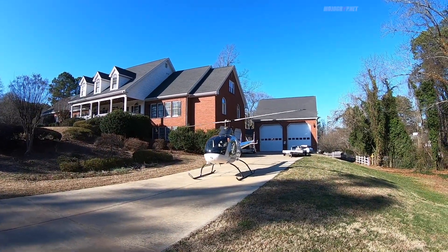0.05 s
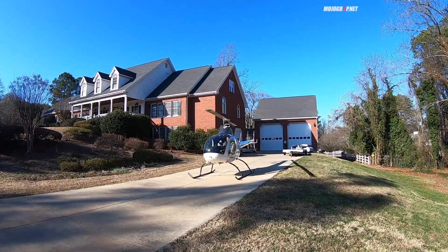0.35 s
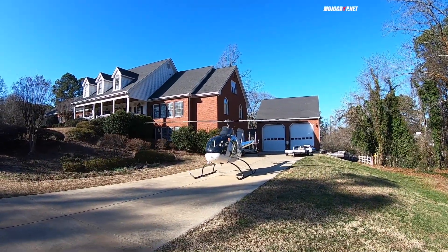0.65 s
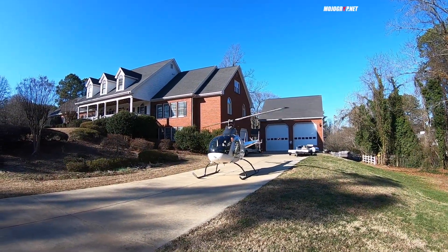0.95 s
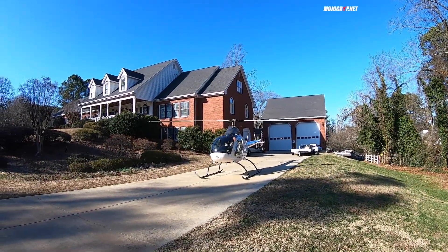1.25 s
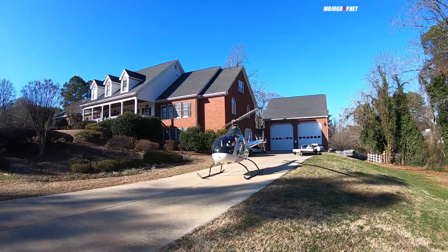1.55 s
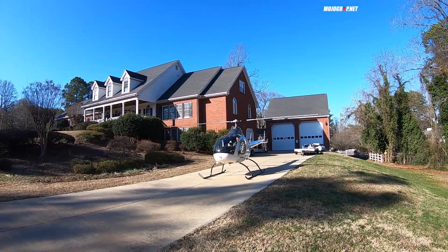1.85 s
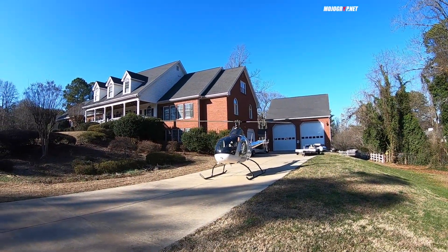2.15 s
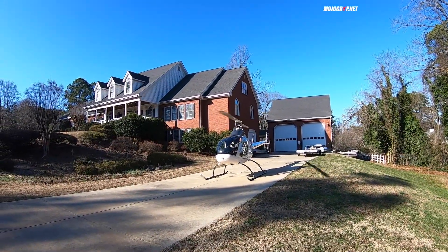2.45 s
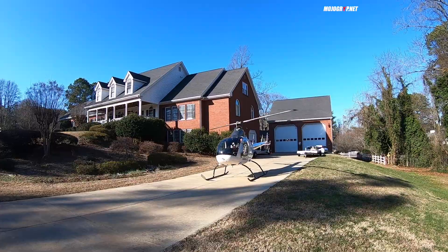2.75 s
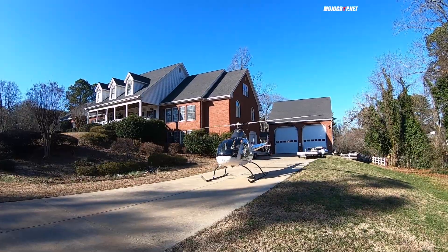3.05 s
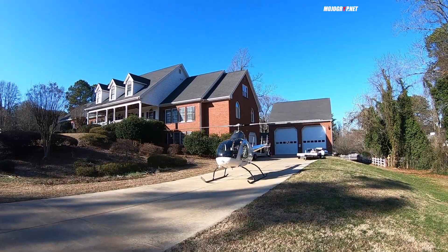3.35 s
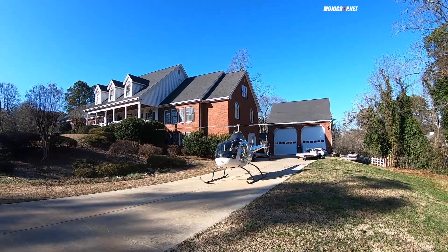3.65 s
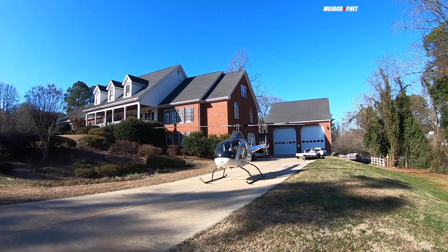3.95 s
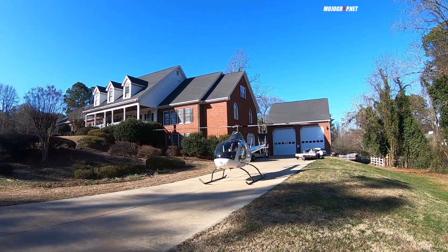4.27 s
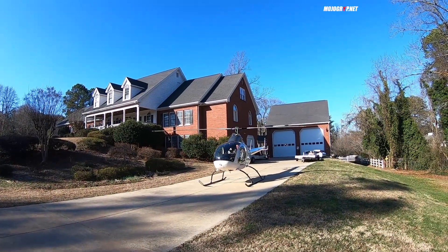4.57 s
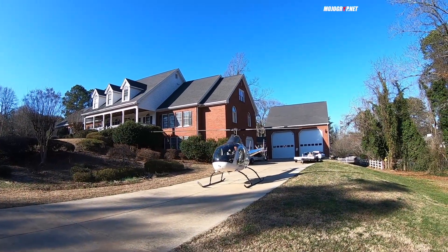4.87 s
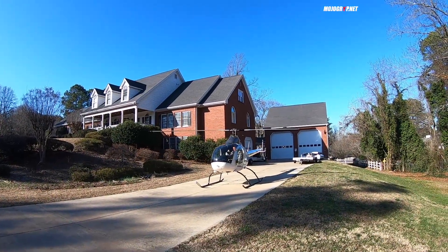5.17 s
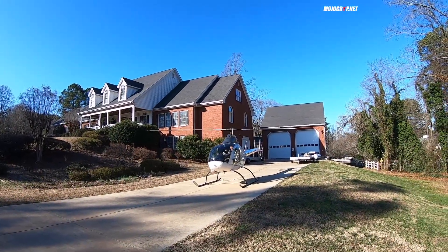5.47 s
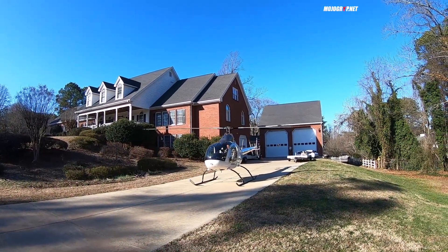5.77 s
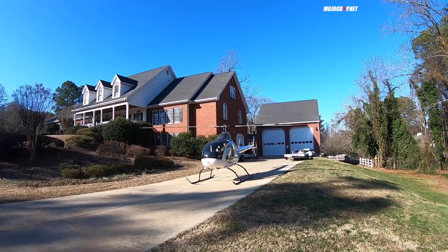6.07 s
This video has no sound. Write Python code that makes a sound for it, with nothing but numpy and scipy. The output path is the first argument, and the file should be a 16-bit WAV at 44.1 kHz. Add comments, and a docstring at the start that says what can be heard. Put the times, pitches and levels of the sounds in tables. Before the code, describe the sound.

Some distance away on a driveway, a small helicopter idles with an uneven, throbbing beat. The throttle soon opens, and the piston engine swells and rises in pitch, rattling as it gathers speed. The sound then settles into an even, booming drone with the tail rotor's hum mixed in and the main blades softly swishing. Towards the end, light gusts brush the microphone.

```python
"""A small helicopter runs up

Some way off, on a driveway by a brick house, four cylinders fire through a booming muffler.
A lumpy idle speeds up and settles into a drone. The engine clatters with every firing, the tail
rotor beats against the exhaust and the main blades swish. Light gusts rumble near the end."""
import sys
import numpy as np
from scipy import signal
from scipy.fft import rfft, irfft, next_fast_len
from scipy.io import wavfile
from scipy.ndimage import uniform_filter1d, minimum_filter1d

SR = 44100
rng = np.random.default_rng(int(sys.argv[2]) if len(sys.argv) > 2 else 0)


def wav_out(sig):
    """Save sig, one row per channel (or a flat mono array), as 16-bit PCM at SR to the path in sys.argv[1]."""
    wavfile.write(sys.argv[1], SR, np.round(np.clip(np.atleast_2d(sig).T, -1, 1) * 32767).astype(np.int16))


N = 278712
TIME = np.arange(N) / SR
FFT_SIZE = next_fast_len(N + SR // 4, True)
HZ = np.fft.rfftfreq(FFT_SIZE, 1 / SR)
IDLE_HZ, FULL_HZ = 30.374, 50.273  # firings per second
CYLINDERS, FIRINGS_PER_BLADE = 4, 7.4146

# Levels in the tables are relative. A "colour" says how strong the low and high pitches are.
# how strongly the exhaust pipe sounds each pitch: f/Hz, level/dB
PIPE_COLOUR = [(30, -18), (40, -25), (50, -29), (70, -29.5), (90, -37), (98, -23), (112, -22), (134, -15.5),
               (160, -17.5), (200, -20), (220, -32.5), (250, -47.5)]
# narrow bands where an exhaust tone fades: f/Hz, width/Hz, gain at the centre (negative flips the wave)
PIPE_DIPS = [(44.3, 1, .5), (48.54, 1, .36), (94.5, 2.4, .3), (147.15, 2.15, -.3), (184.5, 41, .25)]
# boom of the muffler: f/Hz, level/dB
MUFFLER_COLOUR = [(15, -44), (35, -20), (65, -5.5), (85, -6.5), (145, -3), (185, 1), (225, -6.5),
                  (270, -23), (400, -33.5), (900, -66), (4000, -110)]
# surges of uneven firing: peak t/s, half length/s, level/dB
ENGINE_SURGES = [(.24, .1, -17.5), (1.05, 0.55, -21.5)]
# tones of unequal cylinders: multiple of the firing rate, idle level/dB, full-speed level/dB
CYLINDER_TONES = [(1.5, -49, -40.5), (1.75, -37, -57.5), (2.25, -47.5, -33), (2.5, -42.5, -43.5),
                  (2.75, -36, -38.5), (3.25, -35, -33), (3.5, -34.5, -36), (3.75, -32.5, -43),
                  (4.25, -36, -43.5), (4.5, -41.5, -41.5), (5.5, -32.5, -52.5), (6, -35, -47),
                  (7, -51.5, -56), (7.25, -58, -48), (7.5, -47, -50), (8.5, -43, -55.5), (11, -48.5, -51),
                  (11.25, -46, -47), (12, -49, -47.5)]
# tones of the tail rotor and its drive: multiple of the firing rate, idle level/dB, full-speed level/dB
TAIL_ROTOR_TONES = [(1.78, -39.5, -41), (2.79, -55, -42), (2.833, -53.5, -37.5), (3.167, -46.5, -25.5),
                    (3.79, -41, -48.5), (4.167, -35.5, -48.5)]
# loudness shared by rattle, clatter, whine, hiss and blade noise: t/s, level/dB
MACHINE_LEVEL = [(0.08, -34), (0.13, -34.5), (1.48, -38.5), (2.03, -41), (3.69, -39), (4.6, -39),
                 (5.23, -36.5), (6.28, -38.5)]
# low rattle of the engine: f/Hz, level/dB
RATTLE_COLOUR = [(120, -36.5), (250, -2), (350, 0.5), (420, -6.5), (520, 0.5), (620, -1.5), (760, -9.5),
                 (1000, -17), (2000, -45.5), (8000, -82.5)]
# bright clatter of the engine: f/Hz, level/dB
CLATTER_COLOUR = [(400, -13), (750, -12), (1000, 2), (1250, 2.5), (1450, -3), (1750, -3.5), (1950, -3.5),
                  (2450, -3), (3300, -2.5), (4200, -6), (5200, -24.5), (7000, -22.5), (11000, -32),
                  (15000, -58.5)]
# ringing of the pipe, cylinder fins and covers: f/Hz, width/Hz, boost/dB
METAL_RINGS = [(311, 18, 3.5), (547, 50, 3.5), (926, 59, 2.5), (1140, 69, 2), (1352, 63, 4),
               (1630, 144, 5.5), (1740, 89, 7), (2122, 120, 6.5), (3520, 600, 2.5)]
# whine of the thin engine covers: f/Hz, width/Hz, level/dB
COVER_TONES = [(955.5, 28.5, -3), (1617, 65, 0.5), (2066, 24, -3), (2844, 95, -1.5), (3163, 38, -4),
               (3350, 200, -1), (4750, 310, -8)]
# hiss of escaping exhaust gas: f/Hz, level/dB
HISS_COLOUR = [(2500, -20.5), (4200, 1), (4900, 5.5), (5900, -2), (7000, -4), (7800, -4), (8400, -9),
               (9700, -9.5), (11000, -20), (12500, -18.5), (15000, -28)]
# hollow rushes as the engine picks up: peak t/s, half length/s, level/dB
RUSH_SWELLS = [(.9, 0.17, -41), (1.3, 0.15, -30)]
# colour of those rushes: f/Hz, level/dB
RUSH_COLOUR = [(150, -16), (300, 4.5), (480, 6.5), (700, -8), (970, 3), (1250, -4), (2000, -14),
               (4000, -60), (9000, -78)]
# air stirred by the main blades: f/Hz, level/dB
SWISH_COLOUR = [(1500, -13), (4000, -2), (5400, 6), (6500, 4), (7500, 0.5), (8400, -8.5), (9600, -4.5),
                (11200, -20.5), (12500, -19.5), (15000, -38)]
# light gusts of wind: peak t/s, half length/s, level/dB
WIND_GUSTS = [(4.1, 0.45, -43), (4.95, 0.43, -38)]
# rumble of wind on the microphone: f/Hz, level/dB
WIND_COLOUR = [(10, 3), (25, 5), (65, -1.5), (130, 3), (250, -22), (600, -41), (4000, -86)]
# how unlike left and right are: f/Hz, level/dB of their difference against what they share
STEREO_WIDTH = [(250, -45), (500, -17.5), (720, -7), (1000, -9.5), (1450, -11.5), (2000, -16.5),
                (3200, -26.5), (4500, -26), (5200, -6), (6500, -5), (8300, 3.5), (11500, -5), (14500, 2)]
# which way each pitch leans: f/Hz, level/dB of left against right
STEREO_TILT = [(300, 0), (550, -.6), (800, -1.4), (1300, -1.2), (2200, -.3), (4500, 0), (8500, -1.8),
               (12500, 1.7)]


def firing_rate(run_up_s=2.3645, shape=1.3022):
    """The engine runs up: firings per second climb from idle and level off at full speed."""
    return FULL_HZ - (FULL_HZ - IDLE_HZ) * np.exp(-(TIME / run_up_s) ** shape)


def exhaust(firings, rate, load, opened, boom_hz=178, width_hz=45):
    """Five tones at multiples of the firing rate climb through the pipe, which rings after each firing."""
    note, pipe_db = np.zeros(N), spectrum(PIPE_COLOUR)
    for k in range(1, 6):
        hz = k * rate
        lag = np.arctan((hz / boom_hz - boom_hz / hz) * boom_hz / width_hz)
        strength = amp(np.interp(hz, HZ, pipe_db) + drift(9))
        wave = strength * np.exp(1j * (2 * np.pi * k * firings - lag))
        for centre, width, gain in PIPE_DIPS:
            offset = 2j * (hz - centre) / width
            wave = wave * (gain + offset) / (1 + offset)
        note -= wave.real * amp(0.5 * load * (k == 1))  # the lowest tone thumps harder under load
    return np.sqrt(2) * amp(-0.17 - 7.5 * (1 - opened)) * note


def uneven_firing(firings, load, churn=0.82):
    """No two firings are equally strong: the surplus booms in the muffler, with some churning gas."""
    starts, kicks = valve_openings(firings), np.zeros(N)
    kicks[starts] = np.clip(rng.standard_normal(len(starts)), -1.6, 1.6)
    gas = unit_level(kicks) + churn * rng.standard_normal(N)
    strength = np.hypot(amp(-32 + 3 * load), swells(ENGINE_SURGES))
    return strength * coloured(gas, MUFFLER_COLOUR)


def geared_tones(table, firings, rate, throttle, waver_db):
    """Wavering tones geared to the crankshaft; their balance shifts as the engine speeds up."""
    tones, muffler_db = np.zeros(N), spectrum(MUFFLER_COLOUR)
    for multiple, idle_db, full_db in table:
        # a tone fades as it climbs out of the muffler's booming band
        boom_db = np.interp(multiple * rate, HZ, muffler_db)
        db = boom_db + (idle_db - boom_db[0]) * (1 - throttle) + (full_db - boom_db[-1]) * throttle
        strength = amp(db + waver_db * drift(3.06))
        cycles = multiple * firings + rng.random() + 0.031 * drift(4)
        tones += strength * np.cos(2 * np.pi * cycles)
    return np.sqrt(2) * tones


def engine_knocks(firings, colour, ring_s, loose_share, throb, lope):
    """Each cylinder repeats its own knock amid loose, throbbing noise; the metal rings with both."""
    starts, t = valve_openings(firings), np.arange(SR // 10) / SR
    bursts = rng.standard_normal((CYLINDERS, 2, len(t))) * np.exp(-t / ring_s)
    loose = noise_pair() * (1 + throb * np.cos(2 * np.pi * firings))
    knocks = np.zeros((2, N))
    for k, burst in enumerate(bursts):
        blows, own = np.zeros(N), starts[k::CYLINDERS]
        blows[own] = amp(2.1 * rng.standard_normal(N)[own])
        knocks += signal.oaconvolve(blows[None], burst, axes=1)[:, :N]
    blend = np.sqrt(1 - loose_share) * unit_level(knocks) + np.sqrt(loose_share) * unit_level(loose)
    cycle = 1 + lope * np.cos(2 * np.pi * (firings + 1.3) / CYLINDERS)  # one swell per four firings
    metal_db = sum(db / (1 + (2 * (HZ - hz) / width) ** 2) for hz, width, db in METAL_RINGS)
    return yard_echoes(filtered(cycle * blend, spectrum(colour) + metal_db))


def cover_whine():
    """The engine shakes its thin covers, which sing in narrow tones."""
    power = sum(amp(2 * db) / width / (1 + ((HZ - hz) / width) ** 2) ** 2
                for hz, width, db in COVER_TONES)
    return unit_level(filtered(noise_pair(), 10 * np.log10(power)))


def valve_hiss(firings):
    """Gas hisses out in a sharp puff as each exhaust valve cracks open."""
    since_crack = (firings + 0.18) % 1
    puffs = 1 + 1.4 * np.exp(-since_crack / 0.16)
    return coloured(noise_pair() * puffs, HISS_COLOUR)


def pickup_rushes():
    """Two hollow rushes of noise swell as the engine picks up."""
    return swells(RUSH_SWELLS) * coloured(noise_pair(), RUSH_COLOUR)


def blade_howl(blades, centre_hz=575, bend=0.06):
    """A hollow howl whose pitch swings as each main blade comes and goes."""
    hz = centre_hz * (1 + bend * np.cos(2 * np.pi * (blades - 0.561)))
    return unit_level(noise_band(hz, width_hz=50))


def blade_whoosh(blades, centre_hz, glide, width_hz, lag, length):
    """A band of air noise flares and slides in pitch once for each passing blade."""
    position = (blades - lag + .5) % 1 - .5  # 0 in the middle of a pass
    band = noise_band(centre_hz * np.exp(glide * position), width_hz)
    flare = np.exp(-(position / length) ** 2)
    return unit_level(band * flare * amp(1.3 * drift(6.9)))  # no two passes are equally strong


def blade_swish(blades):
    """Air hisses as a blade sweeps towards the listener; a high whoosh falls and a low one rises."""
    sweep_db = 2 * (np.cos(2 * np.pi * blades) + 0.45 * np.cos(4 * np.pi * blades))
    hiss = coloured(noise_pair(), SWISH_COLOUR) * amp(sweep_db + .5 * drift(18))
    high = blade_whoosh(blades, centre_hz=7480, glide=-0.44, width_hz=1700, lag=-.02, length=0.24)
    low = blade_whoosh(blades, centre_hz=797, glide=1.5, width_hz=170, lag=0.01, length=0.2)
    return amp(1.5) * hiss + amp(-6.5) * high + amp(-2) * low


def yard_echoes(pair, echo_db=-10, decay_s=0.02, echoes_per_s=500):
    """Adds scattered echoes from the house front and the trees."""
    t = np.arange(SR // 5) / SR
    taps = rng.standard_normal(len(t)) * (rng.random(len(t)) < echoes_per_s / SR)
    taps *= np.exp(-t / decay_s) * (t > .004)
    echoes = signal.oaconvolve(pair, taps[None] / np.linalg.norm(taps), axes=1)[:, :N]
    return unit_level(pair + amp(echo_db) * echoes)


def breeze():
    """Gusts rumble on the microphone, differently on the left and right."""
    return swells(WIND_GUSTS) * coloured(noise_pair(), WIND_COLOUR)


def stereo(pair, spread):
    """Makes left and right from two versions of a sound: one is shared, one sets them apart."""
    shared, side = pair[0], filtered(pair[1], spectrum(STEREO_WIDTH))
    tilt_db = spectrum(STEREO_TILT) / 2
    side += (filtered(shared, tilt_db) - filtered(shared, -tilt_db)) / 2
    return np.array([shared + spread * side, shared - spread * side])


def valve_openings(firings):
    """Sample numbers at which an exhaust valve opens."""
    return np.flatnonzero(np.diff(np.floor(firings)) > 0)


def amp(db):
    """Turns decibels into a gain to multiply by."""
    return 10 ** (np.asarray(db) / 20)


def unit_level(x):
    """Scales a sound to an average (rms) level of 1."""
    return x / np.sqrt(np.mean(x ** 2) + 1e-20)


def spectrum(table):
    """Joins the points of a colour table into a level for every frequency."""
    hz, db = np.transpose(table)
    return np.interp(np.log(HZ + 1), np.log(hz + 1), db)


def filtered(x, db):
    """Boosts or cuts each frequency, so that it rings after a pulse and never before."""
    cepstrum = irfft(db * np.log(10) / 20, FFT_SIZE)
    cepstrum[1:FFT_SIZE // 2] *= 2
    cepstrum[FFT_SIZE // 2 + 1:] = 0
    return irfft(rfft(x, FFT_SIZE) * np.exp(rfft(cepstrum)), FFT_SIZE)[..., :N]


def coloured(x, table):
    """Gives a sound the colour in a table, at level 1."""
    return unit_level(filtered(x, spectrum(table)))


def noise_pair():
    """Two unrelated streams of white noise."""
    return rng.standard_normal((2, N))


def noise_band(hz, width_hz):
    """Noise passed twice through a resonance that follows a moving pitch."""
    spin = np.exp(2j * np.pi * np.cumsum(hz) / SR)
    decay = np.exp(-np.pi * width_hz / SR)
    band = noise_pair()
    for _ in range(2):
        band = 2 * (spin * signal.lfilter([1 - decay], [1, -decay], band / spin)).real
    return band


def drift(per_s):
    """A random wander of level 1 that heads for a new value `per_s` times a second."""
    points = rng.standard_normal(1024)
    return unit_level(np.interp(TIME * per_s, np.arange(len(points)), points))


def ramp(start_s, takes_s):
    """Rises evenly from 0 to 1 and stays there."""
    return np.clip((TIME - start_s) / takes_s, 0, 1)


def swells(table):
    """A gain that rises and falls smoothly around each peak in a table."""
    return sum(amp(db) * np.exp(-((TIME - s) / half_s) ** 2) for s, half_s, db in table)


def scene():
    """One crankshaft drives the exhaust, the engine noise and both rotors."""
    rate = firing_rate()
    count = np.cumsum(rate) / SR
    firings = count - .455  # goes up by 1 with each firing
    blades = (count - 5.27) / FIRINGS_PER_BLADE  # goes up by 1 with each passing blade
    opened = ramp(start_s=0.58, takes_s=0.5)  # the drone is weaker until the throttle opens
    throttle = ((rate - rate.min()) / np.ptp(rate)) ** 2  # 0 at idle, 1 at full speed
    pickup = np.gradient(rate)
    load = pickup / pickup.max() * opened  # the engine works harder while it gathers speed

    drone = exhaust(firings, rate, load, opened) + uneven_firing(firings, load)
    cylinders = geared_tones(CYLINDER_TONES, firings, rate, throttle, waver_db=0.96)
    tail_rotor = geared_tones(TAIL_ROTOR_TONES, firings, rate, throttle, waver_db=0)
    drone += amp(-2.5 * (1 - opened)) * (cylinders + tail_rotor)

    rattle = engine_knocks(firings, RATTLE_COLOUR, ring_s=0.02, loose_share=0.86, throb=0.052, lope=0.24)
    howl = blade_howl(blades)
    clatter = engine_knocks(firings, CLATTER_COLOUR, ring_s=0.015, loose_share=0.67, throb=0.11, lope=.02)
    machine = amp(0.15 + 4 * load) * rattle + amp(-7.5) * howl + amp(0.64) * clatter
    machine += amp(-1.5 - 7 * throttle) * cover_whine()
    # at idle the hiss comes in puffs from the exhaust; at speed the blades join in
    machine += amp(-11.5 - 1.5 * throttle) * valve_hiss(firings)
    machine += amp(-14 + 2.5 * throttle) * throttle ** 0.47 * blade_swish(blades)
    machine *= amp(np.interp(TIME, *np.transpose(MACHINE_LEVEL)))

    spread = amp(0.7) * ramp(start_s=1.75, takes_s=2.05)  # the sound starts in the centre, then widens
    lean = amp(-39) * spread * np.array([[1], [-1]])  # the drone sits a little to the left
    return drone * (1 + lean) + stereo(machine + pickup_rushes(), spread) + breeze()


def record(dry, ceiling_db=-7.0, cutoff_hz=15650):
    """A limiter holds the strongest firings down, then the highest treble is cut away."""
    allowed = np.minimum(amp(ceiling_db) / (abs(dry).max(0) + 1e-9), 1)
    gain = uniform_filter1d(minimum_filter1d(allowed, size=900), size=700)
    lowpass = signal.firwin(511, cutoff_hz, window=("kaiser", 9), fs=SR)
    return signal.oaconvolve(dry * gain, lowpass[None], "same")


dry = scene()
out = record(dry)
wav_out(out)
```